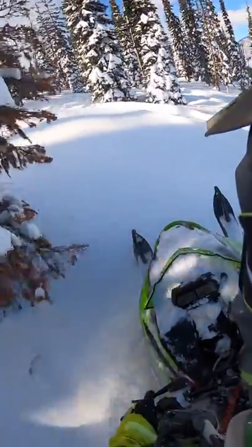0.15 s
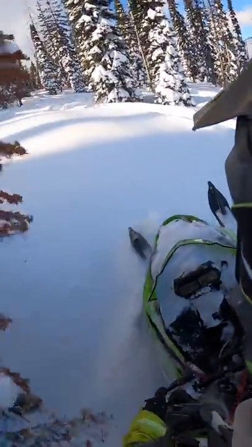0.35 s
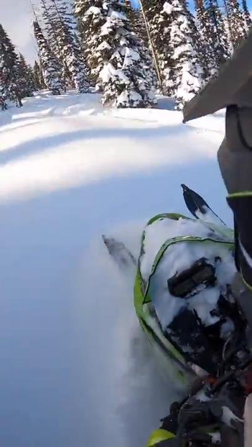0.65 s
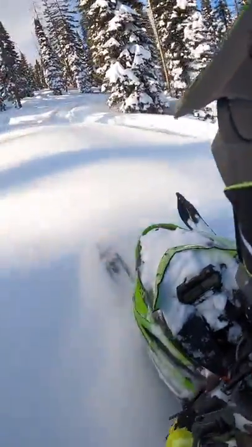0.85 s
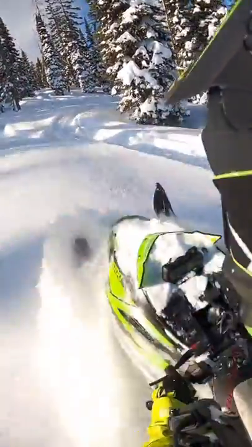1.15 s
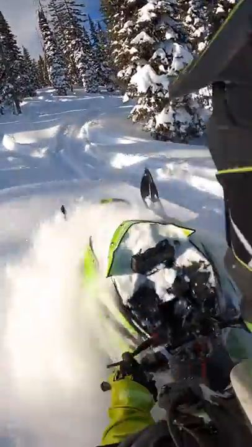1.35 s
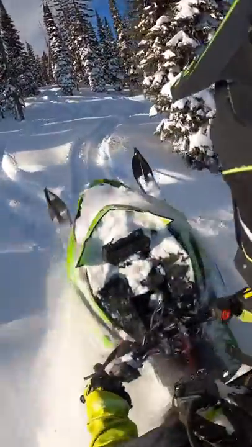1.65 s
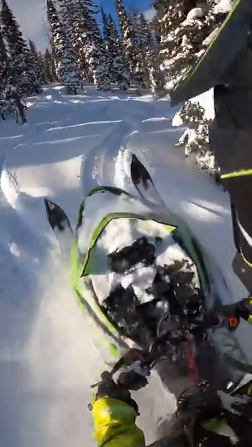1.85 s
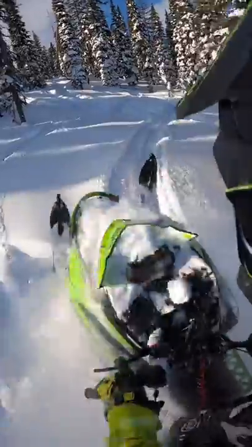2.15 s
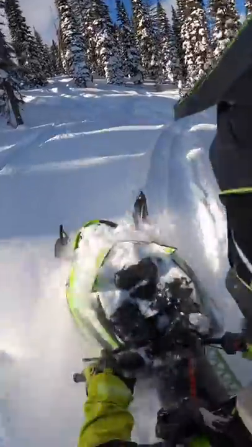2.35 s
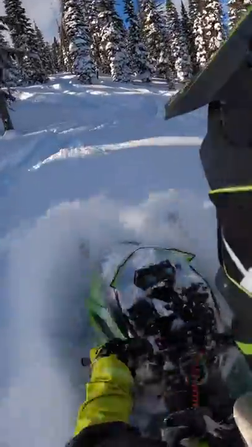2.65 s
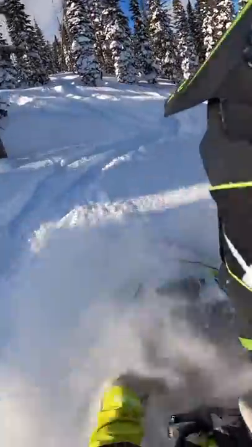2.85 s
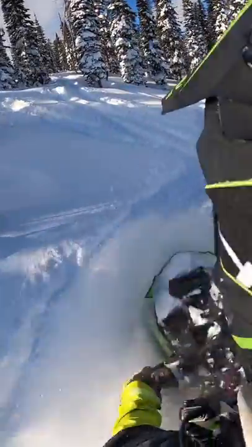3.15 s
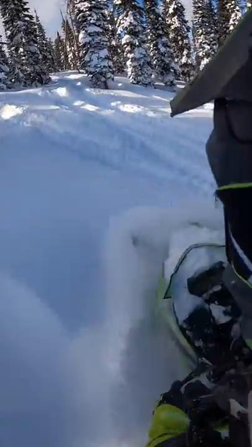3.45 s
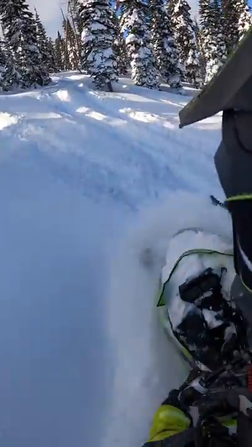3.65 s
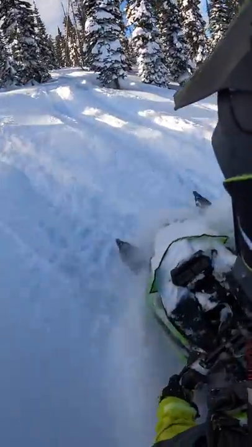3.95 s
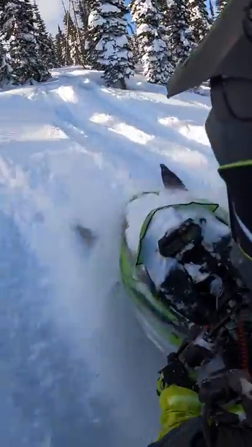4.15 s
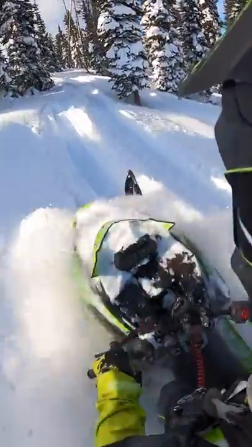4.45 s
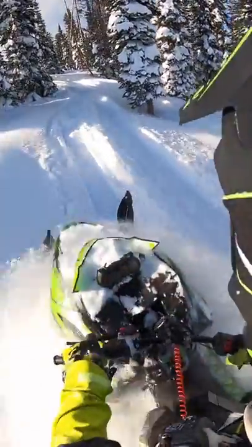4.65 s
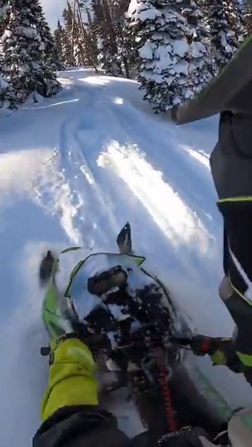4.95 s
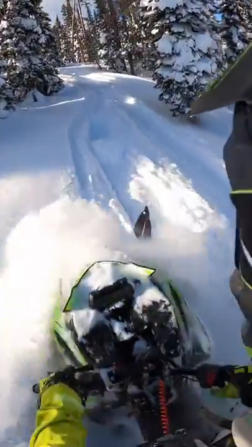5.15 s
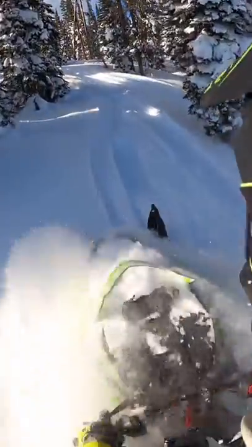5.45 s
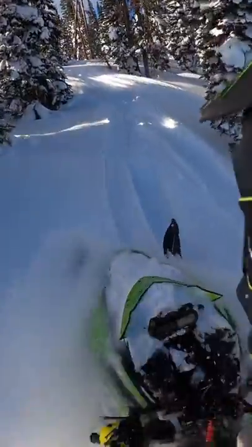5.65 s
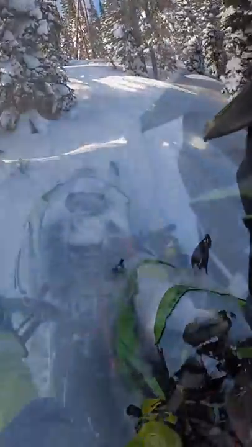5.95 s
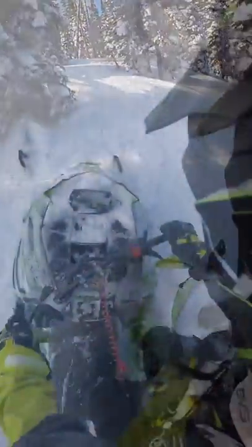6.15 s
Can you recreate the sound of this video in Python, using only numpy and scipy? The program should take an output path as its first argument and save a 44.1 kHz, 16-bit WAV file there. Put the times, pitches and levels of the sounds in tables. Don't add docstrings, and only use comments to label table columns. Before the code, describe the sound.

A two-stroke snowmobile engine is blipped over and over, wailing and burbling through hissing powder, then cuts abruptly to silence before a quiet idle fades in.

```python
import sys
import numpy as np
from scipy import signal
from scipy.fft import rfft, irfft, next_fast_len
from scipy.io import wavfile
from scipy.ndimage import uniform_filter1d

SR = 44100
rng = np.random.default_rng(int(sys.argv[2]) if len(sys.argv) > 2 else 0)


def file_out(sig):
    cols = np.atleast_2d(sig).T
    lim = np.clip(cols, -1, 1)
    pcm = np.round(lim * 32767).astype(np.int16)
    wavfile.write(sys.argv[1], SR, pcm)


def rack_gain(trim_db):
    fader = np.asarray(trim_db, float)
    return 10 ** (fader / 20)


N = 277823
TIME_S = np.arange(N) / SR
CUT_S = 5.6625


def unit(x):
    return x / np.sqrt(np.mean(x ** 2) + 1e-20)


def along(points, hz):
    point_hz, values = np.transpose(points)
    return np.interp(np.log(hz + 1), np.log(point_hz + 1), values)


def curves(tables):
    time_s, *columns = np.concatenate(tables).T
    return [np.interp(TIME_S, time_s, column) for column in columns]


def wobble(rate_hz):
    knots = rng.standard_normal(int(N * rate_hz / SR) + 4)
    return np.interp(np.arange(N) * rate_hz / SR, np.arange(len(knots)), knots)


def bell(time_s, centre_s, half_s):
    return np.exp(-((time_s - centre_s) / half_s) ** 2)


def bumps(rows):
    t = np.arange(0, N, 64) / SR
    total = sum((height * bell(t, s, half) for s, half, height in rows), 0 * t)
    return total.repeat(64)[:N]


def filtered(x, response):
    m = next_fast_len(N + SR // 2)
    return irfft(rfft(x, m) * response(np.fft.rfftfreq(m, 1 / SR)), m)[:N]


def treble(x, corner_hz, steepness):
    return filtered(x, lambda hz: 1 / (1 + (corner_hz / (hz + 1)) ** steepness))


def modes_response(modes, hz):
    total = 0
    for k, (centre, width, db) in enumerate(modes):
        damping = 1j * hz * width
        total = total + (-1) ** k * rack_gain(db) * damping / (centre * centre - hz * hz + damping)
    return total


def rush(spectrum, patchy_db):
    z = signal.stft(rng.standard_normal(N + 512), nperseg=512)[2]
    patches = uniform_filter1d(rng.standard_normal(z.shape), size=6, axis=0)
    patches = uniform_filter1d(patches, size=10, axis=1)
    x = signal.istft(z * rack_gain(patchy_db * unit(patches)), nperseg=512)[1][:N]
    return unit(filtered(x, lambda hz: rack_gain(along(spectrum, hz))))


# opens_s, shaft_then_hz, clutch_holds_s, shaft_then_hz, shuts_s
BLIPS = [(-0.11, 131.0, -0.025, 130.6, 0.084), (0.221, 115.3, 0.521, 128.6, 0.553),
         (0.762, 109.1, 1.076, 134.6, 1.44), (1.45, 135.6, 1.6, 138.4, 1.672),
         (1.808, 102.9, 2.086, 132.5, 2.498), (2.662, 93.8, 2.914, 108.4, 2.915),
         (3.069, 90.1, 3.202, 102.4, 3.279), (3.495, 86.4, 3.681, 102.2, 3.765),
         (3.837, 88.7, 4.128, 129.5, 4.231), (4.545, 76.9, 4.751, 106.0, 4.775),
         (4.962, 83.9, 5.195, 116.6, 5.196), (5.448, 80.6, 5.598, 69.8, 5.7)]
# time_s, shaft_speed_hz
IDLE = [
    (5.8, 61),
    (5.92, 62.5),
    (6.1, 61.1),
    (6.232, 57),
    (6.27, 64),
    (6.3, 65),
]


def throttle():
    creep_hz_per_s, flywheel_s = 4, .083
    opens, low_hz, holds, top_hz, shuts = np.transpose(BLIPS)
    corners = [(opens, low_hz), (holds, top_hz), (shuts, top_hz + creep_hz_per_s * (shuts - holds))]
    ride = np.transpose(corners, (2, 0, 1)).reshape(-1, 2)
    shaft_hz = uniform_filter1d(curves([ride, IDLE])[0], size=round(flywheel_s * SR))
    blip = np.searchsorted(np.r_[opens[1:], IDLE[0][0]], TIME_S)
    since_s = TIME_S - np.r_[holds, 0][blip]
    climbed = np.clip(1 + since_s / np.r_[holds - opens, 1][blip], 0, 1)
    coasting = TIME_S > np.r_[shuts, N][blip]
    return shaft_hz, blip, climbed, np.maximum(since_s, 0), coasting


# top_speed_firing_db, coasting_loss_db, cylinder_mismatch_db, uneven_firing_db, roar_db
FIRING = [(-13, -3.5, -46, -32, -29.5), (-12, -1, -43, -32, -30.5), (-8.5, 0, -44.5, -37, -30.5),
          (-11.5, 2, -42, -33, -31.5), (-13, 8, -46, -31, -29.5), (-23, 7, -44, -31, -28),
          (-30, 5, -47, -27.5, -27.5), (-18, 7, -46, -34, -28.5), (-11, 0, -42.5, -37, -28.5),
          (-16, 12, -42, -31.5, -26.5), (-14, -3, -41, -36, -27), (-15, 0, -43, -36, -28.5),
          (-24, 0, -70, -46, -42)]
# opening_octave_db, top_octave_db, third_partial_db, order_10_db, pulling_orders_14_up_db
OVERTONES = [(-26, -26, -31, -40, -45), (-22, -25, -30, -36, -42), (-20.5, -40, -31, -38, -39),
             (-31, -26, -31, -36, -48), (-22, -27.5, -35, -36, -41), (-32, -29, -40, -39, -50),
             (-33, -31, -46, -48, -48), (-22, -27, -40, -44, -46), (-22, -28, -33, -35, -44),
             (-20, -28, -31, -33, -47), (-26, -25, -35, -37, -40), (-28, -25, -27, -41, -50),
             (-50, -50, -48, -70, -70)]
# order_3_db, order_8_db, magneto_whine_order_12_db
STRAYS = [(-33, -40, -42), (-32, -38, -42), (-31, -38, -41), (-28, -34, -38), (-31, -32, -39),
          (-29, -39, -44), (-34, -50, -41), (-34, -50, -41), (-35, -44, -36), (-37, -38, -35),
          (-34, -35, -35), (-30, -44, -49), (-60, -70, -70)]


def levels(shaft_hz, blip, climbed, since_s, coasting):
    tuned_db_per_hz = .27
    full_shut_hz_per_s = 190
    settle_s = .045
    top_db, loss_db, odd_db, uneven_db, roar_db = np.transpose(FIRING)[:, blip]
    open_db, held_db, third_db, low_db, high_db = np.transpose(OVERTONES)[:, blip]
    top_hz = np.r_[np.transpose(BLIPS)[3], IDLE[0][1]][blip]
    below_top_hz = np.minimum(shaft_hz - top_hz, 0) * (blip < len(BLIPS) - 1)
    shut = coasting * np.clip(-np.gradient(shaft_hz) * SR / full_shut_hz_per_s, 0, 1) ** 2
    bite_db = 4 * bell(climbed, .45, .3)
    sharp_fade_db = np.maximum(-28 * since_s - 8 * shut, -12)
    rows = [top_db + tuned_db_per_hz * below_top_hz - loss_db * coasting,
            open_db + (held_db - open_db) * climbed ** 3.5 - 12 * shut,
            third_db - 8 * shut,
            low_db - 8 * shut,
            high_db + bite_db + sharp_fade_db,
            odd_db + bite_db - 1.5 - 8 * shut,
            *np.transpose(STRAYS)[:, blip] + np.outer([-4, -12, -2], shut),
            uneven_db + 7 * shut,
            roar_db + 3.5 * np.exp(-since_s / .14) + 3.5 * shut]
    return uniform_filter1d(np.array(rows), size=round(settle_s * SR), axis=1) + fade_db()


# centre_s, half_length_s, uneven_firing_db, roar_db, clean_tones_db
STUMBLES = [(1.74, .05, -4, 3, 2), (1.83, .04, 0, -1, -2), (2.17, .07, 4, 0, -1), (2.57, .04, -3, -1, 3),
            (2.71, .04, 3, 0, 2), (2.87, .04, 2, 2, -1), (2.95, .03, 1, -6, 0), (3.06, .025, -4, -5, -3),
            (3.27, .04, -2, -1, -1), (3.38, .05, -5, 0, 0), (2.63, .03, -4, 0, 0), (3.47, .03, -3, 2, 0),
            (3.55, .05, 0, 0, -4), (3.62, .05, -2, -1.5, 0), (3.79, .03, 1, 1, -4), (3.9, .06, 2, -3, 0),
            (4.4, .06, -1, 2, 2), (4.52, .04, -1, 0, 4), (4.8, .03, -3, 0, 4), (4.95, .03, 2, 0, -5),
            (5.08, .05, 2, 0, -2), (5.33, .05, 2, 1, -2), (5.62, .04, 4, 1, -2), (5.915, .02, 8, 0, 0),
            (6.045, .02, 8, 3, -4), (6.142, .015, 8, 3, -3), (6.24, .02, 8, 2, -5)]


def stumbles_db():
    centre_s, half_s, *db = np.transpose(STUMBLES)
    swells = bell(np.arange(0, N, 16) / SR, centre_s[:, None], half_s[:, None])
    return (np.array(db) @ swells).repeat(16, axis=1)[:, :N]


# pitch_hz, width_hz, level_db
COWL = [(1200, 300, 4), (1450, 250, 0), (1770, 220, 3), (2170, 180, 3), (2500, 200, -5), (2870, 220, 1),
        (3300, 180, 2), (3700, 250, -3)]


def cowl_db(hz):
    between = rack_gain(2 * -7) * np.clip(hz / 1000, 0, 1) ** 2
    panels = sum(rack_gain(2 * db) / (1 + (2 * (hz - centre) / width) ** 2) ** 2 for centre, width, db in COWL)
    return 10 * np.log10(between + panels)


# shaft_order, level_db
EVEN_ORDERS = [(14, 0), (16, 1), (18, -1), (20, -5), (22, -3), (24, -5), (26, -8), (30, -10), (28, -10),
               (32, -12), (34, -12)]
# shaft_order, level_db
ODD_ORDERS = [(1, 25), (5, 6), (7, 6), (9, 3), (11, 2), (13, -1), (15, 0), (17, 1), (19, 2), (21, 1),
              (23, -2), (25, -6), (27, -8)]
# centre_s, half_length_s, shaft_order, level_db
FLARES = [(.31, .06, 15, 10), (.44, .07, 16, 10), (.35, .04, 18, 2), (.5, .08, 26, 8), (.3, .06, 10, 4),
          (.35, .1, 22, -4), (.45, .1, 14, -3), (.81, .03, 16, 5), (.88, .07, 15, 6), (.84, .05, 26, 4),
          (.96, .06, 24, 4), (.9, .1, 18, -5), (.9, .1, 22, -4), (.95, .1, 20, -4), (1.02, .08, 14, -5),
          (1.1, .07, 21, 4), (1.4, .13, 21, 6), (1.62, .05, 16, 11), (1.62, .05, 17, 11),
          (1.61, .05, 20, 9), (1.87, .04, 12, 5), (1.95, .025, 19, 12), (1.97, .035, 18, 8),
          (1.9, .05, 16, -6), (2.0, .035, 12, 5), (2.15, .06, 22, 2), (2.2, .12, 21, 7), (2.25, .1, 14, -5),
          (1.83, .03, 4, 5), (2.83, .05, 13, 7), (3.72, .1, 5, 6), (4.1, .1, 15, 7), (4.66, .07, 5, 13),
          (4.76, .06, 13, 10), (5.1, .04, 21, 9), (5.15, .04, 20, 8), (5.17, .05, 14, 8),
          (5.15, .06, 11, 5), (4.57, .08, 12, -10), (3.52, .05, 4, -6), (3.75, .04, 4, -9),
          (4.5, .08, 6, -8), (5.47, .08, 6, -6), (3.93, .06, 6, -6), (1.47, .08, 4, -4), (5.34, .05, 5, 8),
          (4.1, .1, 9, -5), (4.2, .08, 5, -8), (5.27, .05, 8, 10), (3.87, .06, 5, 6)]
# centre_s, half_length_s, level_db
SWELLS = [(.49, .08, 1.5), (1.77, .02, 3), (1.85, .03, -3), (2.14, .03, 2), (2.2, .03, -3), (2.42, .04, 1),
          (2.48, .02, -4), (2.54, .03, 5), (2.7, .04, -5), (2.84, .06, 5), (3.3, .04, 4), (3.62, .03, 1),
          (3.92, .06, -1.5), (.75, .05, -2), (4.8, .03, 4), (4.9, .05, -9), (5.04, .05, 4), (5.22, .03, 2),
          (5.28, .03, -2), (5.63, .04, 4)]


def orders(shaft_hz, turns, ragged, fire_db, octave_db, third_db, *sharp_db):
    falling_hz_per_s = np.minimum(uniform_filter1d(np.gradient(shaft_hz) * SR, size=2000), 0)
    shut_db = 3 * np.tanh(falling_hz_per_s / 60)
    *blurred_db, whine_db = sharp_db
    low_db, high_db, odd_db, third_order_db, eighth_db = (db + shut_db for db in blurred_db)

    def tone(order, db, drift_db):
        flare_db = bumps([(s, half, size) for s, half, k, size in FLARES if round(k) == order])
        drift = .35 * wobble(6) + (.7 + .6 * ragged) * wobble(30)
        sine = np.sin(2 * np.pi * (order * turns + rng.random()))
        return rack_gain(db + flare_db + drift_db * drift) * np.sqrt(2) * sine

    def upper(order, db):
        panel_db = cowl_db(order * shaft_hz[::64]).repeat(64)[:N]
        return tone(order, db + panel_db, drift_db=2.2)

    out = tone(2, fire_db + bumps(SWELLS), drift_db=1.4)
    out += tone(4, octave_db, drift_db=1.66)
    out += tone(6, np.minimum(third_db, odd_db + 16), drift_db=1.5)
    out += tone(3, third_order_db, drift_db=2.5)
    out += tone(8, eighth_db, drift_db=2)
    out += upper(10, low_db - 2)
    out += tone(12, whine_db, drift_db=2)
    for order, db in EVEN_ORDERS:
        out += upper(order, high_db + db)
    for order, db in ODD_ORDERS:
        darken_db = -.6 * (order - 11) * ragged * (order > 1)
        out += upper(order, odd_db + db - 1.5 + darken_db)
    return out


# time_s, size_in_usual_departures
POPS = [(2.578, 1.5), (2.623, 1.8), (2.7, 1.5), (2.846, 2), (3.042, 1.5), (3.144, 1.2), (3.332, 1.5),
        (3.375, 3), (3.536, 2), (3.745, 1.5), (3.788, .8), (3.841, 1.5), (2.676, 2), (2.967, 1.2),
        (2.99, 1.8), (3.11, 1.8), (3.196, 1.5), (3.264, 1.5), (3.414, 2), (4.461, 1), (4.555, 1.5),
        (4.903, 1.5), (4.973, 2), (5.033, 1.5), (5.064, 1.5)]
# time_s, size_in_usual_departures, roar_duck_db
BACKFIRE = (3.089, 4.8, -7)


def firing_blows(turns, gas, departures, pop_size):
    fired = np.flatnonzero(np.diff(np.floor(2 * turns)))
    blows = gas * rng.standard_normal(N)
    blows[fired] += departures[:len(fired)]
    for s, size in POPS + [BACKFIRE[:2]]:
        blows[round(s * SR)] -= pop_size * size
    return blows


# pitch_hz, width_hz, level_db
PIPE = [(101.9, 78, 0.5), (214.4, 95.2, 4), (316.7, 96, 1), (438.6, 106, -3.5), (795, 463, -13.5),
        (1170, 360, -14.5)]


def burble(turns):
    blows = firing_blows(turns, .081, rng.standard_normal(3000), 1)
    return unit(filtered(blows, lambda hz: modes_response(PIPE, hz)))


# centre_s, level_db, half_length_s
DUCKS = [
    (2.92, -5, .025),
    (3.02, -4, .03),
    (3.12, -14, .025),
    (3.44, -14, .055),
    (3.8, -2, .04),
    (4.03, -3, .03),
    (4.9, -4, .05),
    (5.5, -3, .04),
]


def hiss_dips_db():
    return sum(db * bell(TIME_S, s, half) for s, db, half in DUCKS)


# pitch_hz, level_db_per_hz
ROAR = [(290, -37.5), (500, -4), (642, -11), (706, -8.5), (897, -18.5), (1210, -5), (1450, -10.5),
        (2160, -17), (2370, -17.5), (4250, -20), (6060, -30.5), (7880, -74), (13300, -120)]
# centre_s, half_length_s, level_db
GULPS = [(.03, .08, 2), (.2, .04, -2), (.3, .08, -1), (.68, .05, -3), (.8, .03, 0), (1.1, .05, -2),
         (1.62, .05, 1), (1.75, .03, -2), (1.98, .04, 3), (2.15, .03, -2), (2.36, .08, -4), (2.62, .04, 1),
         (2.72, .04, -3), (2.85, .04, 2), (3.14, .05, -5), (3.26, .04, 4), (3.5, .07, -2), (3.75, .07, -2),
         (3.06, .025, -3), (3.35, .02, -3), (.55, .05, -2), (5.65, .02, 4), (4.1, .08, -2), (4.28, .04, -4),
         (4.37, .04, 1), (4.61, .05, -3), (4.78, .06, 0), (4.92, .04, 1), (5.11, .03, 4), (5.2, .025, 4),
         (5.25, .025, -1), (5.43, .05, 1), (5.57, .05, -1)]
# time_s, level_over_hiss_db
SPARKLE = [(0, 0.5), (1.75, 4.5), (1.85, -7), (2.15, -4), (2.25, -1), (3.4, -13.5), (3.6, -11)]


def intake_roar(turns, roar_db):
    throb = 1 + .083 * np.cos(4 * np.pi * turns) + .033 * np.cos(2 * np.pi * turns)
    gain_db = roar_db + bumps(GULPS) - 3 + .7 * wobble(16)
    roar = rack_gain(gain_db) * unit(throb * rush(ROAR, patchy_db=1.5))
    crisp_db = .43 * curves([SPARKLE])[0] + 1.5 + .45 * hiss_dips_db()
    roar += (rack_gain(crisp_db) - 1) * treble(roar, 3500, 6)
    roar -= .4 * (TIME_S > CUT_S) * treble(roar, 1600, 6)
    return roar * rack_gain(BACKFIRE[2] * bell(TIME_S, BACKFIRE[0] + .03, .018))


RAGGED = [0, 0, 0, .2, .1, 1, 1, .7, .3, .8, .8, .8, 0]


def engine():
    shaft_hz, *state = throttle()
    *lines_db, uneven_db, roar_db = levels(shaft_hz, *state)
    lumpy_db, rush_db, clean_db = stumbles_db()
    ragged = uniform_filter1d(np.array(RAGGED)[state[0]], size=3000)
    turns = np.cumsum(shaft_hz * (1 + (.0018 + .006 * ragged) * wobble(60))) / SR
    burble_db = np.maximum(uneven_db, roar_db - 15) + lumpy_db + 9.2 + .6 * wobble(15)
    out = rack_gain(clean_db) * orders(shaft_hz, turns, ragged, *lines_db)
    out += rack_gain(burble_db) * burble(turns)
    out += intake_roar(turns, roar_db + rush_db)
    return out + sputter(turns) + rasp(turns)


# time_s, lug_rate_hz, level_db
TRACK = [
    [(0.0, 177.8, -26), (0.6, 176.0, -26), (0.8, 151.1, -23), (1.11, 191.3, -24.5), (1.5, 199.7, -23),
     (1.75, 227.2, -24), (1.94, 197.5, -31), (2.15, 195.4, -29.5), (2.45, 157, -39)],
    [(4.1, 171.2, -33), (4.228, 171.7, -22.5), (4.312, 160.6, -27), (4.4, 147.4, -29.5)],
    [(5.08, 150.6, -34), (5.142, 150.5, -22), (5.22, 140.9, -26)],
]


def track():
    lug_hz, lug_db = curves(TRACK)
    spells = sum((TIME_S > rows[0][0]) * (TIME_S < rows[-1][0]) * 1. for rows in TRACK)
    spinning = uniform_filter1d(spells, size=3000)
    phase = 2 * np.pi * np.cumsum(lug_hz * (1 + .0056 * wobble(40))) / SR
    return spinning * rack_gain(lug_db + 2.4 * wobble(25)) * np.sqrt(2) * np.sin(phase)


# time_s, strength_db
WIND = [(0, -28), (.6, -26.5), (.95, -30), (1.5, -28), (1.9, -29), (2.12, -25), (2.4, -36), (2.62, -21),
        (2.95, -19), (3.3, -17), (3.8, -19), (3.95, -26), (4.3, -29), (4.5, -17), (4.75, -25),
        (5.08, -21.5), (5.4, -24), (5.66, -30)]
# time_s, level_db
SPRAY = [(0, -53), (.45, -51.5), (.7, -53.5), (.96, -51), (1.25, -54), (1.64, -52.5), (2.05, -53.5),
         (2.33, -60.5), (2.87, -58.5), (3.3, -56), (3.7, -53.5), (4.3, -55.5), (4.75, -53.5), (5.36, -53),
         (5.66, -56)]
# pitch_hz, level_db_per_hz
BUFFET = [(8.8, -37), (15, 0), (65, 8.5), (117, 4), (157, -11), (220, -15.5), (290, -33.5), (480, -120)]
# pitch_hz, level_db_per_hz
HISS = [(5000, -5.5), (6500, 12.5), (8000, 5), (10500, 4), (12000, -1), (13500, -8), (14600, -20),
        (15500, -60)]


def weather():
    idle_wind_db, idle_hiss_db = -35, -84
    riding = TIME_S < IDLE[0][0]
    buffet_db = np.where(riding, curves([WIND])[0], idle_wind_db) + fade_db() + 1.4 * wobble(9)
    hiss_db = np.where(riding, curves([SPRAY])[0], idle_hiss_db) + fade_db()
    hiss_db += hiss_dips_db() + .8 * wobble(10)
    buffet = rush(BUFFET, patchy_db=.7)
    hiss = rush(HISS, patchy_db=1.1)
    fine = treble(hiss, 11600, 16)
    powder = hiss - fine + rack_gain(curves([SPARKLE])[0]) * fine
    return rack_gain(uniform_filter1d(buffet_db, size=3000) - 2.5) * buffet + rack_gain(hiss_db + .6) * powder


# centre_s, half_length_s, level_db
SPUTTERS = [(1.73, .05, -33), (1.81, .03, -33), (2.55, .04, -36), (2.64, .03, -38), (2.72, .025, -36),
            (2.8, .03, -34), (2.86, .04, -30), (2.98, .02, -38), (3.1, .015, -29), (3.17, .02, -40),
            (3.3, .03, -33), (3.385, .015, -31), (3.46, .06, -28), (3.79, .02, -31), (4.4, .05, -34),
            (4.47, .03, -35), (4.72, .04, -33), (4.87, .04, -35), (4.98, .03, -31), (5.06, .05, -32),
            (5.34, .05, -32), (5.47, .07, -34), (5.6, .04, -35)]
# pitch_hz, width_hz, level_db
CAN = [(560, 200, 0), (800, 260, -1), (1220, 300, -2), (1750, 400, -8)]


def sputter(turns):
    blows = firing_blows(turns, .12, rng.laplace(size=3000), 1.3)

    def can(hz):
        low_cut = hz ** 2 / (hz ** 2 + 450 ** 2)
        return modes_response(CAN, hz) * low_cut / (1 + 1j * hz / 2500) ** 3

    bursts = bumps([(s, half, rack_gain(db)) for s, half, db in SPUTTERS])
    return bursts * unit(filtered(blows, can))


# centre_s, half_length_s, level_db, pitch_hz, width_hz
RASP = (5.435, .065, -29.5, 2080, 420)


def rasp(turns):
    centre_s, half_s, db, hz, width = RASP
    chatter = (1 + np.cos(2 * np.pi * 59 * (TIME_S - 5.401))) ** 2
    shaken = chatter * (1 + .5 * np.cos(4 * np.pi * turns)) * rng.standard_normal(N)
    buzz = unit(filtered(shaken, lambda f: modes_response([(hz, width, 0)], f) ** 2))
    return rack_gain(db) * np.exp(-((TIME_S - centre_s) / half_s) ** 4) * buzz


def fade_db():
    starts_s, full_s = 5.83, 6.3
    risen = np.clip((TIME_S - starts_s) / (full_s - starts_s), .01, 1)
    return np.where(TIME_S < IDLE[0][0], 0, .75 * 20 * np.log10(risen))


# start_s, peak_db, pitch_hz
TICKS = [
    (5.8973, -49.5, 2140),
    (5.9329, -46.5, 2220),
    (5.9623, -56, 1920),
    (5.996, -54, 2100),
    (6.028, -47.5, 2150),
    (6.0905, -43, 2090),
    (6.1242, -43, 2320),
    (6.1891, -52, 2450),
    (6.2092, -51, 1910),
]
# centre_s, level_db
PUFFS = [
    (6.05, -57),
    (6.25, -52),
]


def clutch():
    ticks = np.zeros(N + SR)
    t = TIME_S[:600]
    for s, db, hz in TICKS:
        ticks[round(s * SR):][:600] += rack_gain(db - 60 * t / .016) * np.sin(2 * np.pi * hz * t)
    swell = sum(rack_gain(db) * bell(TIME_S, s, .0085) for s, db in PUFFS)
    air = rush([(500, -30), (2500, -7), (4500, 5), (6000, -10), (9000, -50)], patchy_db=4)
    return ticks[:N] + swell * air


def scene():
    return (engine() + track() + weather() + clutch())[None]


def top_cut(x):
    return signal.sosfilt(signal.butter(12, 15550, fs=SR, output="sos"), x)


def record(dry):
    limited = dry / (1 + np.abs(dry / .85) ** 4) ** (1 / 4)
    misfit = np.abs(limited[0] + .2) + (np.abs(TIME_S - CUT_S) > .0015)
    cut_s = TIME_S[np.argmin(misfit)]
    opening = np.clip((TIME_S - 5.83) / .06, 0, 1)
    mix = np.where(TIME_S <= cut_s, limited, limited * opening)
    return top_cut(mix)


dry = scene()
out = record(dry)
file_out(out)
```